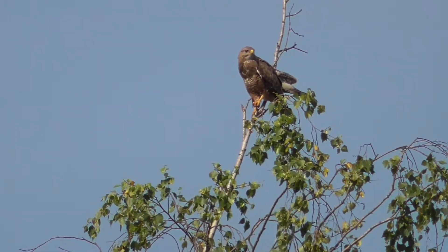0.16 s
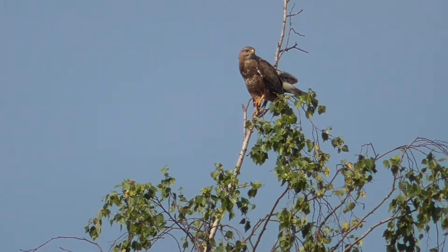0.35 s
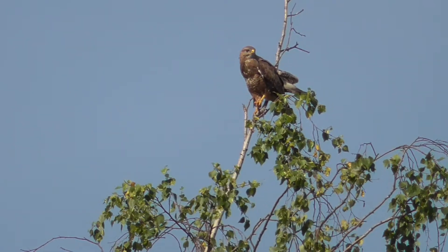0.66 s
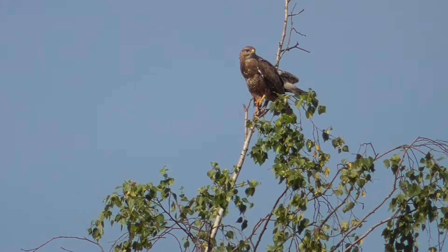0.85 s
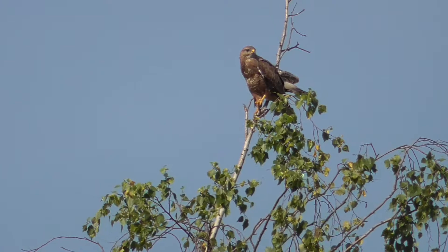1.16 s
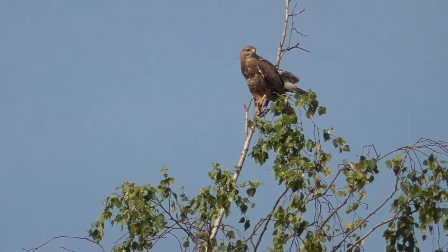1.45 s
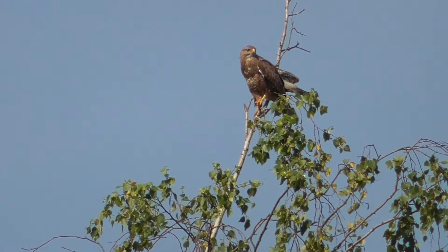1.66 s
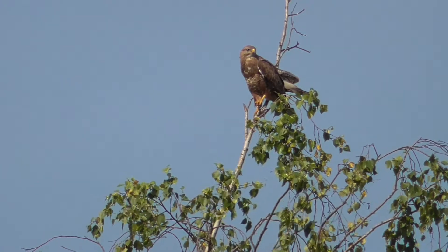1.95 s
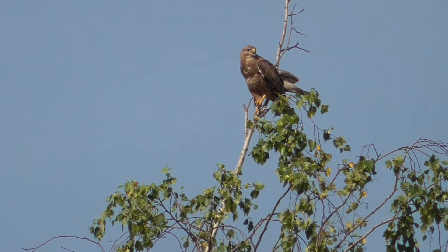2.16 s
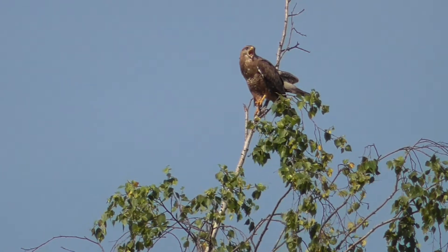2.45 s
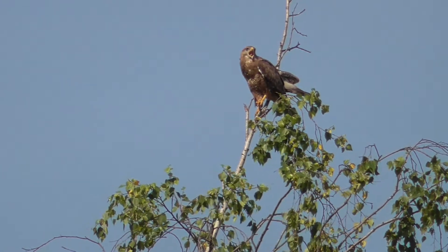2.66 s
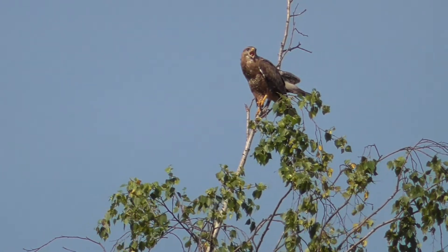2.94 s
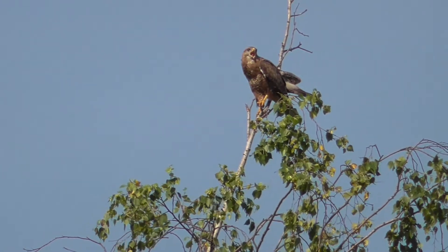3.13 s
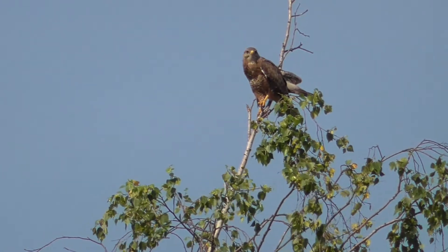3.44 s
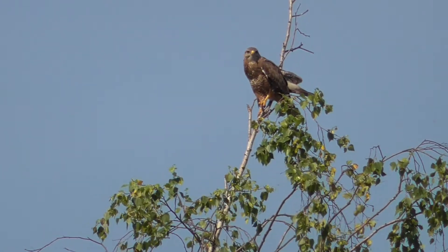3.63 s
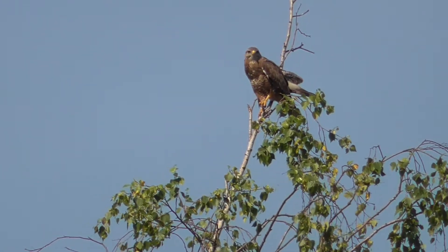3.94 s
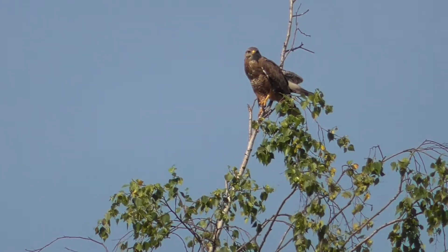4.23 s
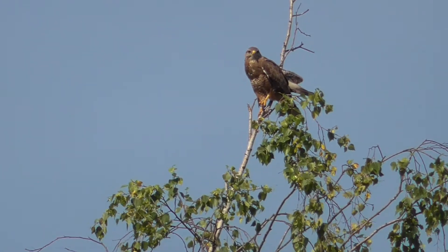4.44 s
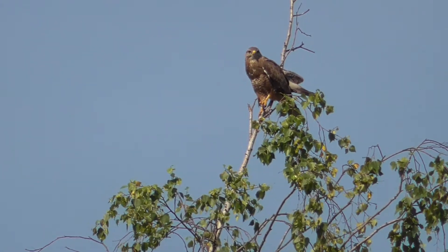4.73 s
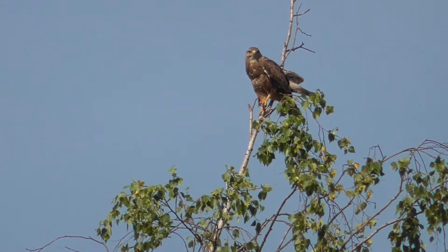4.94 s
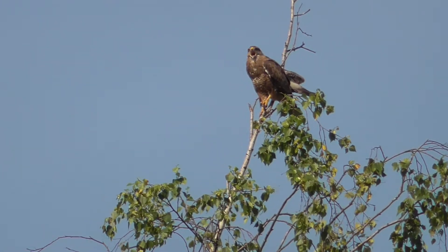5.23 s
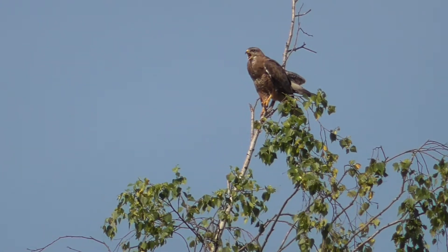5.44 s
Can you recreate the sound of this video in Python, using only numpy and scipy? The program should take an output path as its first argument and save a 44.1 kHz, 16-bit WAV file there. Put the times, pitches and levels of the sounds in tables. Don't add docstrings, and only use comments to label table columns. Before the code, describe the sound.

Open countryside with low distant road rumble and soft leaf hiss. A faint cricket ticks about four times a second, and a far small bird trills near the start. Midway, a treetop buzzard gives one clear mew, leaping up and sliding down, with a light echo from trees. Afterwards a heavy vehicle's low drone swells far off, with grasshopper rasps and thin bird seeps; another mew barely starts at the cut.

```python
import sys
import numpy as np
from scipy import signal
from scipy.io import wavfile
from scipy.ndimage import uniform_filter1d

SR = 44100
rng = np.random.default_rng(int(sys.argv[2]) if len(sys.argv) > 2 else 0)


def volts_from_decibels(level):
    exponent = np.asarray(level, float) / 20
    return 10 ** exponent


def wav_record(signal):
    frames = np.transpose(np.atleast_2d(signal))
    bounded = np.clip(frames, -1, 1)
    quanta = np.round(bounded * 32767).astype(np.int16)
    wavfile.write(sys.argv[1], SR, quanta)


N = 246519

# time in seconds, level in dB, load as the dB by which the upper note leads the drone.
DRONE = [(0, -46.5, 5), (.42, -44, 0.5), (.58, -51, 2), (.9, -59, -5), (1.3, -50, -6.5),
         (1.75, -53.5, -5.5), (2.1, -53.5, -7), (2.26, -46, 0), (2.5, -49, -5.5), (2.85, -45, 1.5),
         (3.4, -40, 0.5), (3.8, -36, 3.5), (4.1, -37, -1), (4.6, -40, 3.5), (4.9, -37.5, -3.5),
         (5.1, -39, 0.5), (5.35, -44.5, 10.5), (5.59, -42.5, -2)]
# frequency in Hz, level in dB per Hz.
DRONE_COLOUR = [(70, -34), (95, -32), (120, 1), (145, 6), (165, -3), (185, -8), (220, -64)]
NOTE_COLOUR = [(140, -38), (165, 2), (190, 5), (202, -2), (225, -18.5), (270, -52)]
ROAR_COLOUR = [(200, -46), (240, 2), (300, 6), (360, -1), (420, -43)]

# frequency in Hz, level in dB per Hz.
ROADS_COLOUR = [(12, -69), (20, -46), (53, -18.5), (69, -8), (118, -3), (190, -4.5), (240, -10.5),
                (310, -11.5), (450, -11), (760, -12.5), (900, -10.5), (1200, -16), (1600, -23),
                (1800, -32.5), (2800, -37.5), (4000, -77)]
HISS_COLOUR = [(1200, -32), (2000, 0.5), (2800, -8.5), (3460, -4), (5000, -5.5), (5900, -7.5), (7000, -2),
               (7950, 0.5), (10500, 1), (13100, -1.5), (15500, -3), (15800, -28)]
# time in seconds, roads in dB, leaves in dB.
DRIFT = [(0, 1.2, 0.3), (1, 1.2, 1.6), (2, 0.1, 0.7), (3, 0, 2), (4, 0.1, 0), (5, -0.2, 1.4),
         (5.6, 0.3, 0.9)]
# frequency in Hz, likeness from -1 to 1.
ROADS_LIKENESS = [(60, .9), (160, .85), (270, .4), (450, -.04), (740, .2), (1220, .15), (2500, .1)]
# frequency in Hz, left minus right in dB.
BALANCE = [(60, -2), (240, -1.5), (950, -2), (3770, 0), (15000, -0.5)]

# time in seconds, level in dB, pitch in Hz.
TICKS = [(0.4658, -63, 7080), (0.7148, -63, 7080), (0.9552, -62, 7350), (1.1924, -53, 7230),
         (1.4294, -60, 7100), (1.6661, -56, 7210), (1.8991, -60, 7080), (2.1291, -58, 7090),
         (2.366, -61, 7100), (2.8355, -61, 6690), (3.0634, -60, 6590), (3.2929, -58, 7190),
         (3.5309, -56, 6760), (3.7604, -60, 7040), (3.9948, -61, 7090), (4.2244, -64, 6910),
         (4.4573, -56, 7190), (4.6902, -59, 7010), (4.9227, -56, 7030), (5.1502, -61, 7130),
         (5.3857, -59, 7180)]
# time in seconds, level in dB, pitch in Hz.
RASPS = [(1.6604, -53, 12800), (2.8364, -54, 10200), (2.8694, -61, 10300), (2.9054, -54, 10400),
         (2.9555, -53, 11200), (3.0044, -52, 11200), (3.0639, -51, 11660), (4.5293, -51, 10100),
         (4.592, -56, 10600), (4.7404, -60, 10400), (4.7814, -52, 11300), (4.8199, -52.5, 12300),
         (4.8564, -59.5, 11700), (4.8944, -50, 12600), (4.9382, -52, 10300)]

# start in seconds, length in seconds, level in dB, centre in Hz, widest warble in Hz.
TRILLS = [
    (1.135, 0.04, -47, 7500, 150),
    (1.168, 0.28, -46, 7387, 350),
]
SEEPS = [
    (4.06, .19, -66, 7250, 130),
    (4.995, .065, -56, 7330, 130),
    (5.075, .13, -63, 7320, 110),
    (5.0, .21, -73, 6050, 95),
]
BUZZES = [
    (2.205, .15, -54, 5500, 830),
    (3.497, 0.099, -52.5, 5700, 810),
]
# attack in seconds, release in seconds, level change in dB per second,
# pitch drop in Hz per second, warble at the start and at the end as shares of the widest.
TRILL_SHAPE = (.022, .03, 6, -60, .3, 1.05)
SEEP_SHAPE = (.03, .025, -10, 1500, .7, .95)
BUZZ_SHAPE = (.016, .04, -125, 3300, 1.1, .3)

# time in seconds, pitch in Hz.
SLIDE = [(2.903, 1145), (2.958, 1021), (2.985, 1006), (3.006, 945), (3.072, 928), (3.185, 797), (3.27, 736),
         (3.31, 678), (3.43, 560)]
# time in seconds, level in dB.
EFFORT = [(2.645, -39), (2.668, -39.5), (2.71, -25.5), (2.745, -37.5), (2.82, -41), (2.97, -43),
          (3.15, -41), (3.39, -45.5), (3.43, -60)]
# time in seconds, boost in dB.
GAPE = [(2.64, 7), (2.71, -4.8), (2.8, -1), (2.905, -17), (2.932, 12), (2.985, 11), (3.05, -3), (3.15, 14),
        (3.26, 3)]
# frequency in Hz, share of the boost from 0 to 1.
GAPE_BAND = [(2630, 0), (4030, 1), (5300, 1), (6900, 0)]
# frequency in Hz, width in Hz, level in dB.
WINDPIPE = [(955, 243, -10), (1495, 225, -7.5), (2009, 257, -3), (2543, 769, 5), (2813, 150, -6),
            (3015, 262, -37), (3766, 167, -13), (4176, 212, -9.5), (4680, 431, -18), (5082, 177, -15),
            (5743, 429, -21.5), (6072, 159, -18.5), (7490, 1306, -18), (9121, 309, -13)]
# start in seconds, level against the first in dB.
NEXT_MEW = (5.582, -7)

# frequency in Hz, time to die by 60 dB in seconds.
TREES = [(800, 0.36), (2500, 1), (4500, 1), (6000, 0.92), (8000, 0.33)]


def evened(x):
    return x / np.sqrt(np.mean(x ** 2) + 1e-20)


def read(points, hz):
    f, value = np.transpose(points)
    return np.interp(np.log(hz + 1), np.log(f + 1), value, left=value[0], right=value[-1])


def curves(rows, smooth_s):
    s, *columns = np.transpose(rows)
    t = np.arange(s[0], s[-1], 1 / SR)
    span = max(int(smooth_s * SR), 1)
    return [uniform_filter1d(np.interp(t, s, c), span, mode="nearest") for c in columns]


def add(mix, s, sound):
    part = mix[round(s * SR):][:len(sound)]
    part += sound[:len(part)]


def wander(length, rate_hz):
    span = max(int(SR / rate_hz), 1)
    once = uniform_filter1d(rng.standard_normal(length), span)
    return evened(uniform_filter1d(once, span))


def resonate(x, hz, width):
    turn = np.exp(2j * np.pi * hz * np.arange(x.shape[-1]) / SR)
    r = np.exp(-np.pi * width / SR)
    smooth = signal.lfilter([(1 - r) ** 2], [1, -2 * r, r * r], x / turn)
    return 2 * (turn * smooth).real


def noise(colour, likeness, patchy_db, size):
    hop, hz = size // 4, np.fft.rfftfreq(size, 1 / SR)
    a, b, c, d, patches = rng.standard_normal((N // hop + 5, len(hz), 5)).T
    patches = evened(uniform_filter1d(uniform_filter1d(patches, 10, 0), 10, 1))
    same = np.clip(likeness + 0 * hz, -1, 1)[:, None]
    left = a + 1j * b
    right = same * left + np.sqrt(1 - same ** 2) * (c + 1j * d)
    z = np.array([left, right])
    z *= volts_from_decibels(np.array([.5, -.5])[:, None] * read(BALANCE, hz))[..., None]
    z *= volts_from_decibels(read(colour, hz)[:, None] + patchy_db * patches)
    return evened(signal.istft(z, nperseg=size, noverlap=size - hop)[1][:, :N])


def traffic():
    db, load_db = (np.pad(c, (0, N), "edge")[:N] for c in curves(DRONE, 0.027))
    drone = noise(DRONE_COLOUR, 1.0, 1.84, size=4096)
    note = noise(NOTE_COLOUR, 0.89, 1.5, size=4096)
    engine = volts_from_decibels(db - 3.5) * (volts_from_decibels(-load_db / 2) * drone + volts_from_decibels(load_db / 2) * note)

    nearest_s, spread_s = 4.15, .5
    distance = np.hypot(1, (np.arange(N) / SR - nearest_s) / spread_s)
    roar = volts_from_decibels(-51.5) * noise(ROAR_COLOUR, 0.38, 0.81, size=4096) / distance
    hum = volts_from_decibels(-59) * evened(resonate(rng.standard_normal(N), hz=81.4, width=7.1))
    return engine + roar + hum


def field():
    roads_db, leaves_db = (c[:N] for c in curves(DRIFT, 0.28))
    roads_same = read(ROADS_LIKENESS, np.fft.rfftfreq(2048, 1 / SR))
    roads = volts_from_decibels(-47.5 + roads_db) * noise(ROADS_COLOUR, roads_same, 0.18, size=2048)
    hiss = volts_from_decibels(-58.5 + leaves_db) * noise(HISS_COLOUR, .04, 0.8, size=1024)
    whine = volts_from_decibels(-74) * evened(resonate(rng.standard_normal((2, N)), hz=12950, width=300))
    return roads + hiss + whine


def insects(events, length_s, width, teeth_per_s):
    out = np.zeros(N)
    for s, db, hz in events:
        scrape = rng.standard_normal(2000)[:int(length_s * SR)]
        tooth_place = np.arange(len(scrape)) * teeth_per_s / SR % 1
        scrape = scrape * (0.21 + (tooth_place < .3))
        stroke = evened(resonate(scrape, hz, width)) * np.hanning(len(scrape))
        add(out, s - 0.23 * length_s, volts_from_decibels(db) * stroke)
    return out


def small_birds(calls, shape, warble_hz, uneven, lean, fade):
    out = np.zeros(N)
    attack_s, release_s, level_db_per_s, drop_hz_per_s, first, last = shape
    for s, length, db, hz, depth_hz in calls:
        t = np.arange(0, length, 1 / SR)
        edge = np.clip(np.minimum(t / attack_s, (length - t) / release_s), 0, 1)
        rate_hz = warble_hz * (1 + uneven * wander(len(t), 33.5))
        swing = np.sin(2 * np.pi * np.cumsum(rate_hz) / SR)
        strength = np.sqrt(2) * volts_from_decibels(db + level_db_per_s * t) * edge ** 2
        strength *= (1 - lean * swing) * (1 - fade * swing ** 2)
        depth = depth_hz * (first + (last - first) * t / length)
        pitch = hz - drop_hz_per_s * t + depth * swing
        add(out, s, strength * np.sin(2 * np.pi * np.cumsum(pitch) / SR))
    return out


def mew_pitch(t, start_s):
    top_s, top_hz, rise_hz = 2.71, 1526, 925
    let_go_s, relaxed_hz, relax_s = 2.738, 1075, .077
    rise = top_hz - rise_hz * np.clip((top_s - t) / (top_s - start_s), 0, 1) ** 2.7
    arch = rise - 72000 * (np.clip(t, top_s, let_go_s) - top_s) ** 2
    arch = relaxed_hz + (arch - relaxed_hz) * np.exp(-np.maximum(t - let_go_s, 0) / relax_s)
    slide = np.interp(t, *np.transpose(SLIDE))
    on_arch = (t < let_go_s) | (t < SLIDE[0][0]) & (arch > slide)
    return uniform_filter1d(np.where(on_arch, arch, slide), size=300, mode="nearest")


def windpipe(hz):
    grid = np.arange(0, SR / 2, 5)
    pipe = 0
    for k, (f, width, db) in enumerate(WINDPIPE):
        pipe = pipe + (-1) ** k * volts_from_decibels(db) / (1 + 2j * (grid - f) / width) ** 2
    notch = 1 - .74 / (1 + 2j * (grid - 2817) / 63)
    return np.interp(hz, grid, 20 * np.log10(abs(pipe * notch)))


def buzzard():
    start_s = 2.634
    t = np.arange(start_s, SLIDE[-1][0], 1 / SR)
    hz = mew_pitch(t, start_s)
    hoarse = .002 + .045 * np.exp(-np.arange(len(hz)) / SR / .012)
    phase = 2 * np.pi * np.cumsum(hz * (1 + hoarse * wander(len(hz), 216))) / SR

    effort_db = uniform_filter1d(np.interp(t, *np.transpose(EFFORT)), size=250, mode="nearest")
    gape_db = np.interp(t, *np.transpose(GAPE))
    loss_db = 1.8 + 6.8 * (1 - hz / hz.max())
    call = np.zeros(len(t))
    for k in range(1, 8):
        partial_db = effort_db + windpipe(k * hz) - (k - 1) * loss_db
        partial_db += read(GAPE_BAND, k * hz) * gape_db
        flutter_db = (.3 + .25 * k) * wander(len(hz), 60)
        call += volts_from_decibels(partial_db + flutter_db) * np.sin(k * phase)
    onset_s = .011
    call *= np.sqrt(2) * np.clip(np.minimum(t - start_s, t[-1] - t) / onset_s, 0, 1) ** 2

    out = np.zeros(N)
    next_s, next_db = NEXT_MEW
    add(out, start_s, call)
    add(out, next_s, volts_from_decibels(next_db) * call)
    puff_s = .03
    for s in (start_s, next_s):
        air = evened(resonate(rng.standard_normal(int(puff_s * SR)), hz=3200, width=3000))
        add(out, s - puff_s / 2, volts_from_decibels(-64) * air * np.hanning(len(air)))
    return out


def echo(x, delay_s):
    taps = np.zeros((2, SR))
    at = np.arange(0, SR - 20, 20)
    at = at + rng.integers(0, 20, (2, len(at)))
    np.put_along_axis(taps, at, rng.choice([-1., 1.], at.shape), 1)
    taps[:, :int(delay_s * SR)] = 0
    hz, t, z = signal.stft(taps, SR, nperseg=256)
    dying = volts_from_decibels(-60 * t / read(TREES, hz)[:, None])
    tail = signal.istft(z * dying, SR, nperseg=256)[1]
    return signal.fftconvolve(x[None], tail / np.linalg.norm(tail[0]), axes=1)[:, :N]


def scene():
    mix = traffic() + field()
    cricket = insects(TICKS, length_s=0.011, width=1050, teeth_per_s=600)
    mix += volts_from_decibels(-2.5) * cricket * volts_from_decibels(np.array([[-.6], [.6]]))
    grasshopper = insects(RASPS, length_s=0.023, width=5200, teeth_per_s=900)
    mix += volts_from_decibels(-6.0) * grasshopper * volts_from_decibels(np.array([[-2.5], [1.5]]))

    trill = small_birds(TRILLS, TRILL_SHAPE, warble_hz=48, uneven=.1, lean=.35, fade=.1)
    trill += small_birds(SEEPS, SEEP_SHAPE, warble_hz=48, uneven=.1, lean=.35, fade=.1)
    late = .66 * (np.roll(trill, 1) + np.roll(trill, 2))
    mix += volts_from_decibels(-6.0) * np.array([late, trill]) + volts_from_decibels(-3.0) * echo(trill, .004)
    buzz = small_birds(BUZZES, BUZZ_SHAPE, warble_hz=75, uneven=.3, lean=.15, fade=.85)
    mix += volts_from_decibels(-2.5) * buzz + volts_from_decibels(-3.0) * echo(buzz, .004)

    mew = buzzard()
    dull = signal.lfilter(*signal.butter(2, 6500, fs=SR), mew)
    mix += mew + volts_from_decibels(-15) * echo(dull, .022)
    return mix


def roll_off(x):
    return signal.sosfilt(signal.butter(12, 15660, fs=SR, output="sos"), x)


def record(dry):
    return roll_off(dry)


dry = scene()
out = record(dry)
wav_record(out)
```